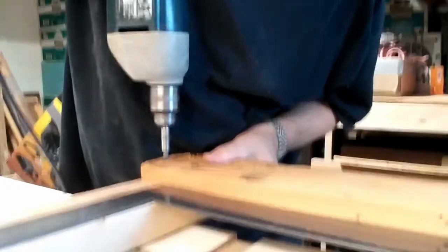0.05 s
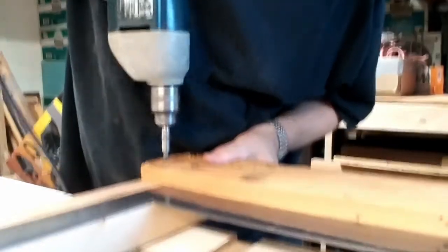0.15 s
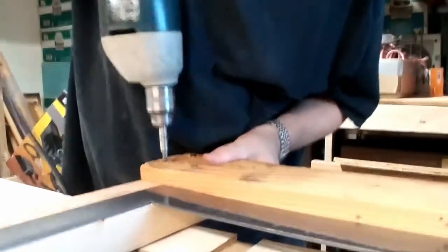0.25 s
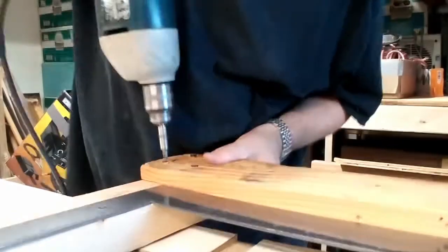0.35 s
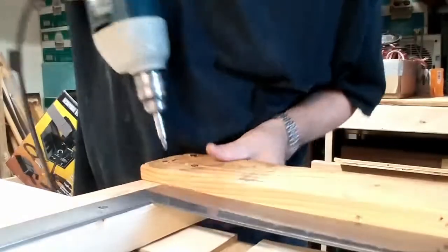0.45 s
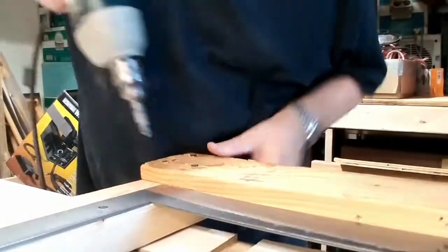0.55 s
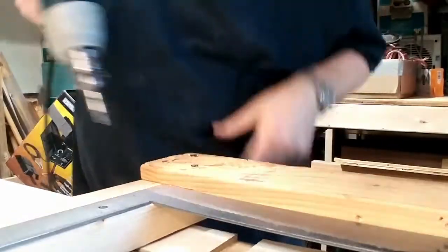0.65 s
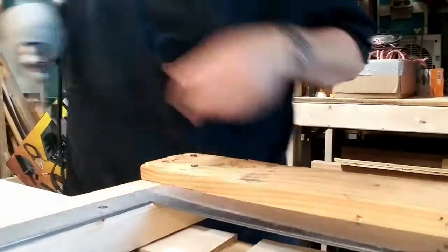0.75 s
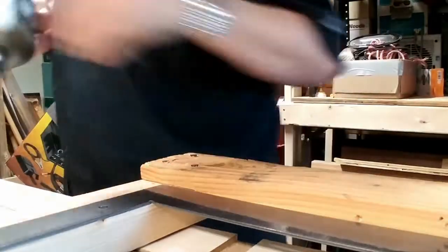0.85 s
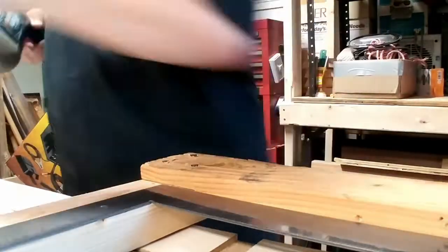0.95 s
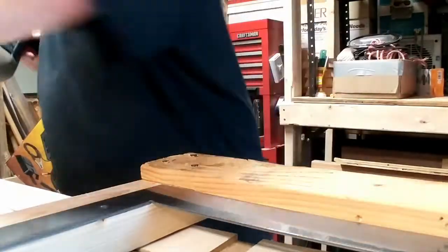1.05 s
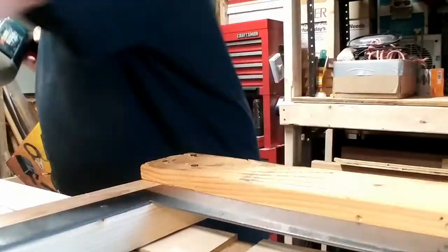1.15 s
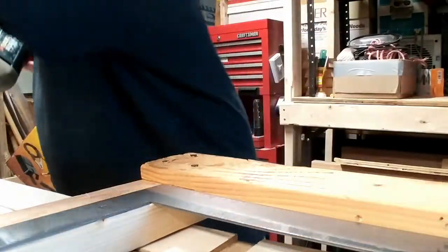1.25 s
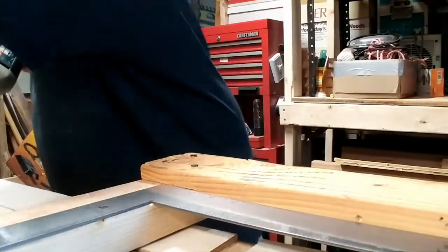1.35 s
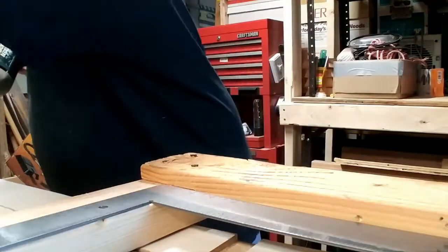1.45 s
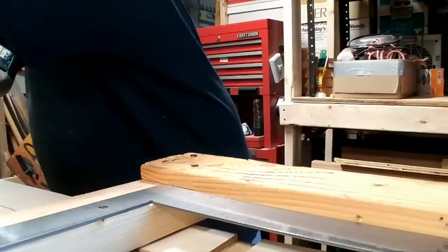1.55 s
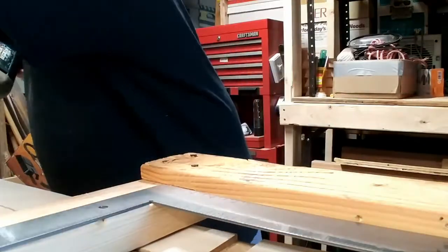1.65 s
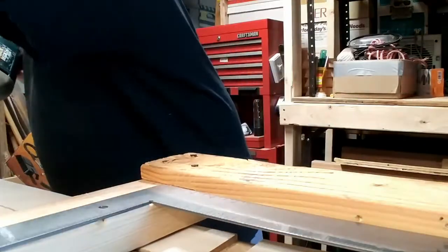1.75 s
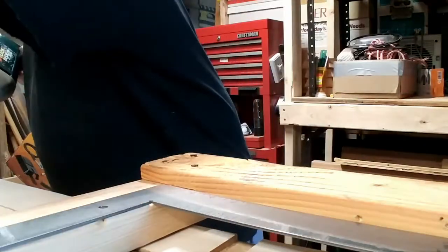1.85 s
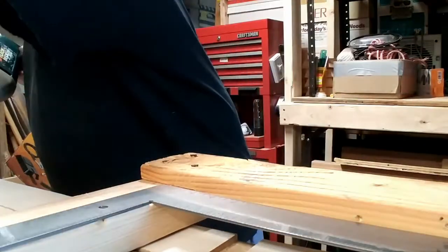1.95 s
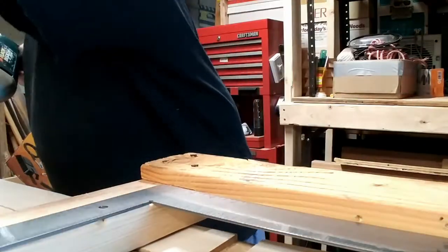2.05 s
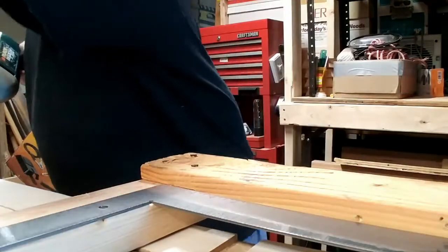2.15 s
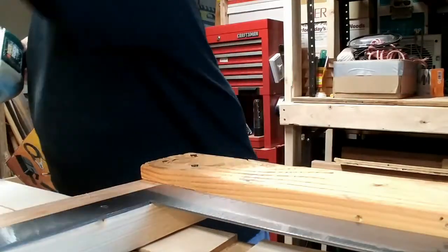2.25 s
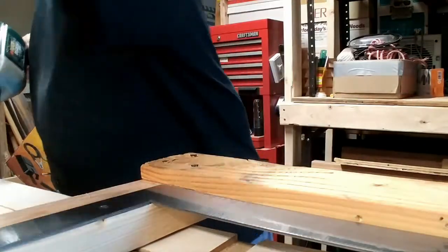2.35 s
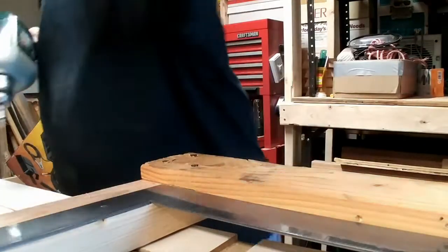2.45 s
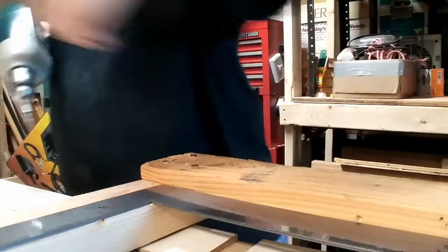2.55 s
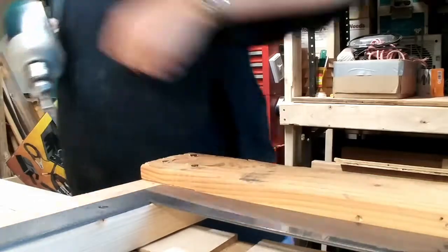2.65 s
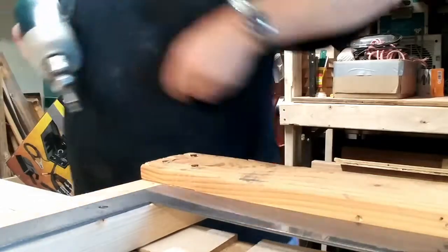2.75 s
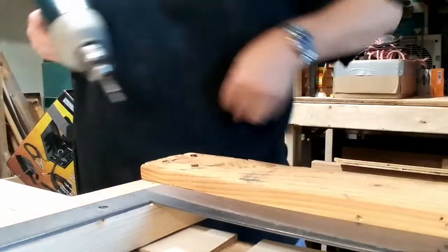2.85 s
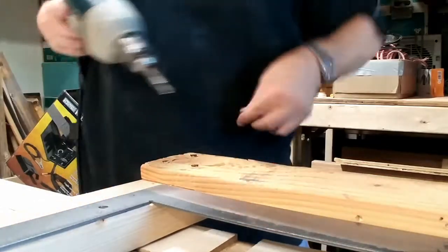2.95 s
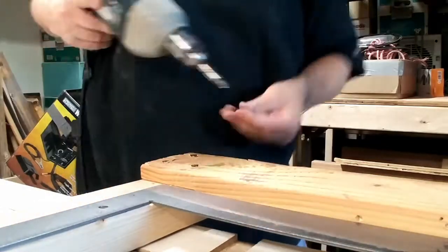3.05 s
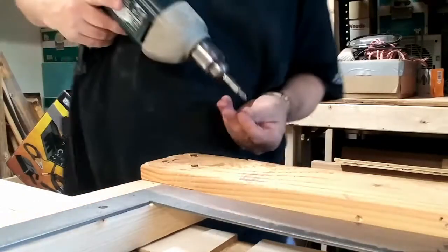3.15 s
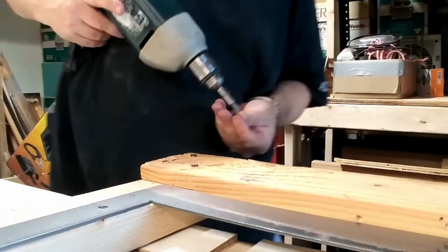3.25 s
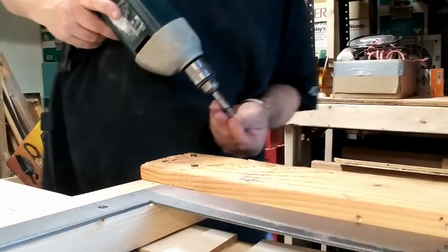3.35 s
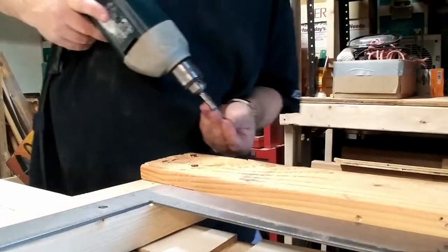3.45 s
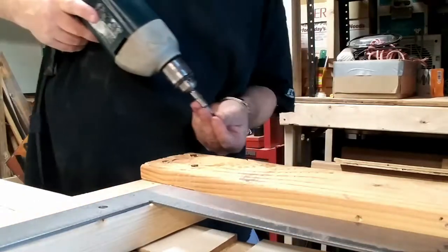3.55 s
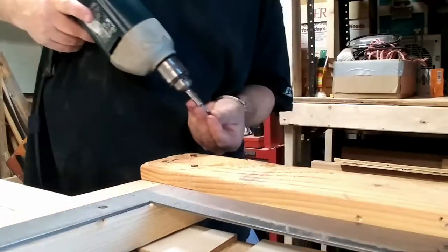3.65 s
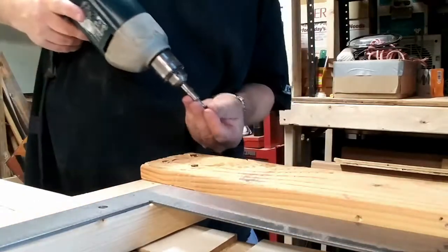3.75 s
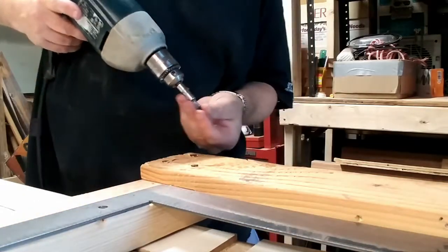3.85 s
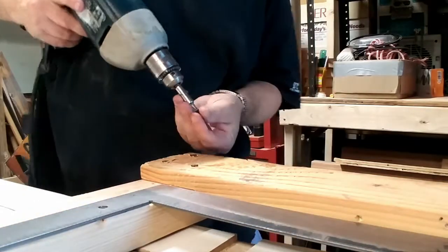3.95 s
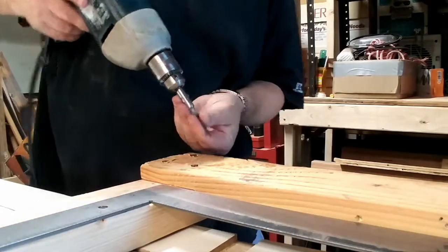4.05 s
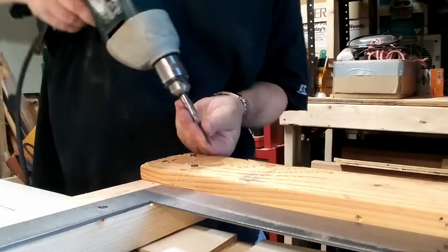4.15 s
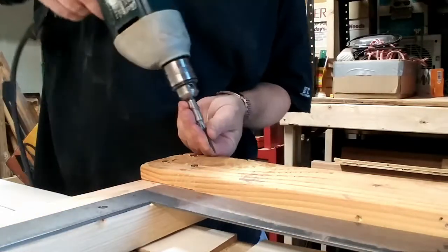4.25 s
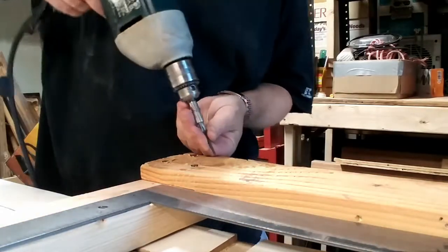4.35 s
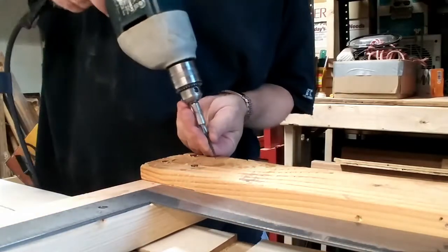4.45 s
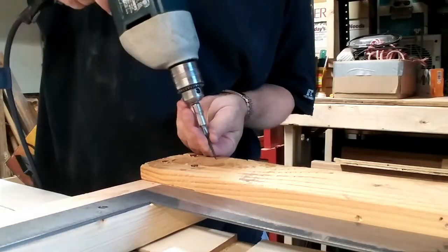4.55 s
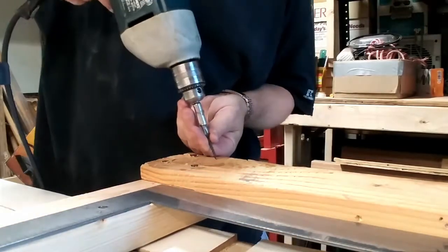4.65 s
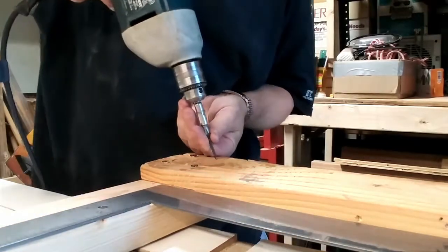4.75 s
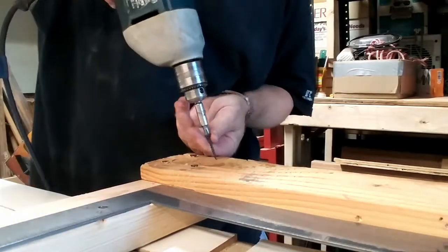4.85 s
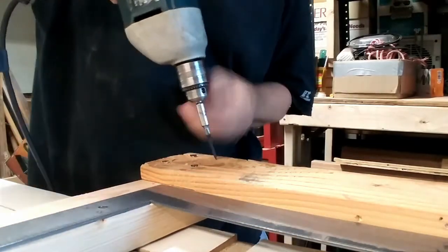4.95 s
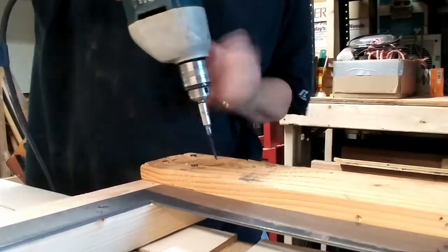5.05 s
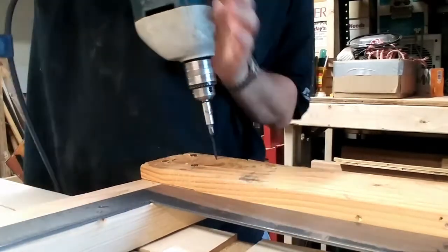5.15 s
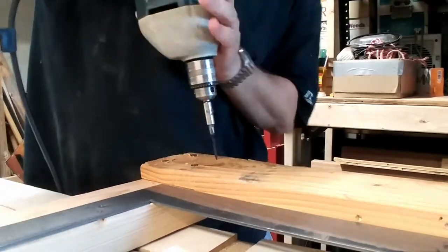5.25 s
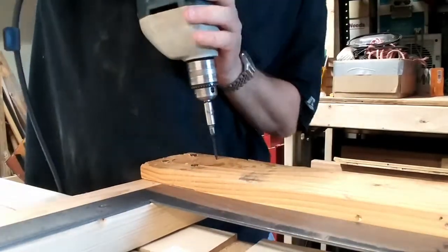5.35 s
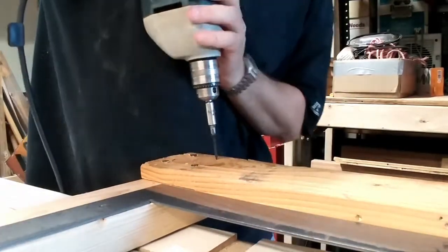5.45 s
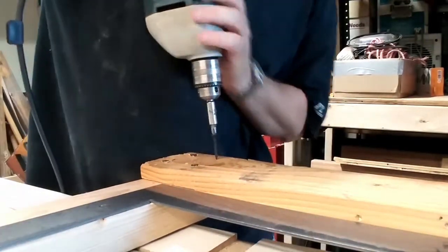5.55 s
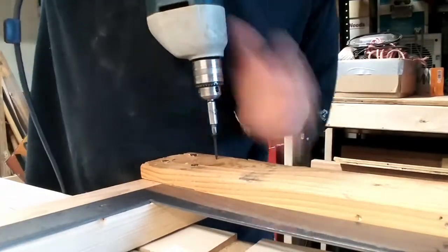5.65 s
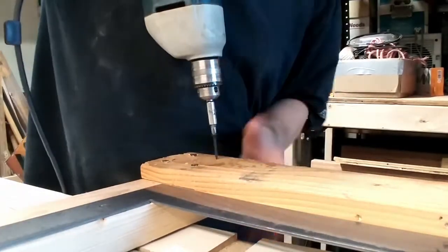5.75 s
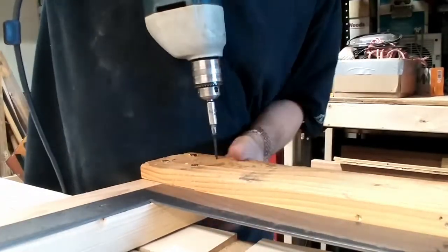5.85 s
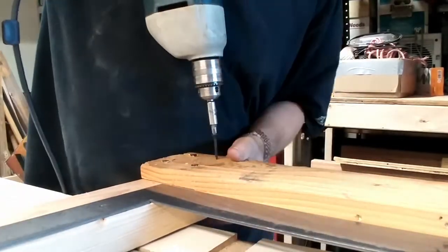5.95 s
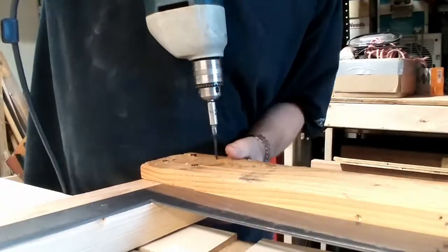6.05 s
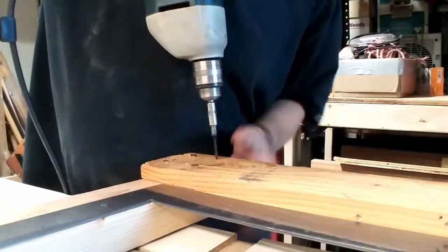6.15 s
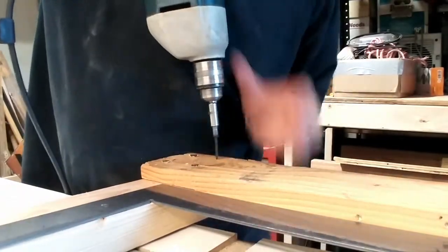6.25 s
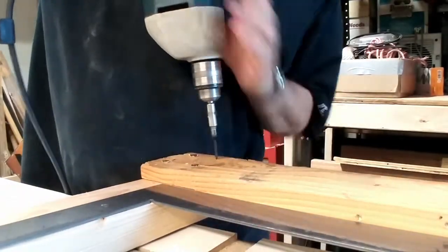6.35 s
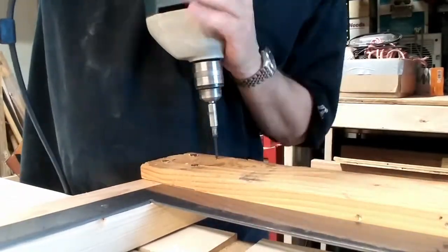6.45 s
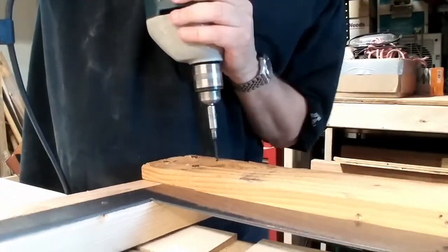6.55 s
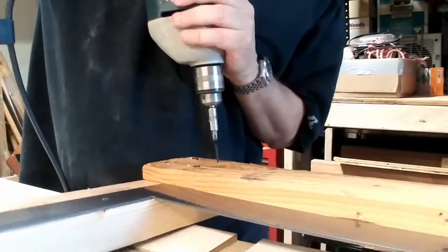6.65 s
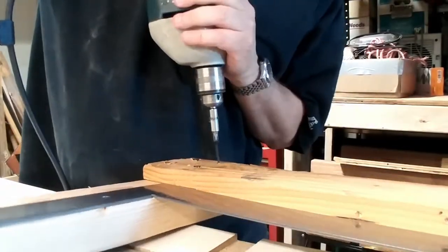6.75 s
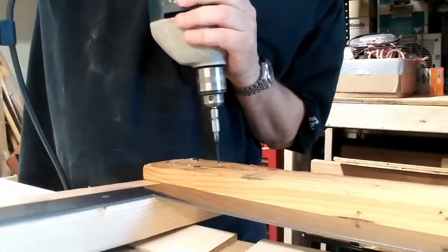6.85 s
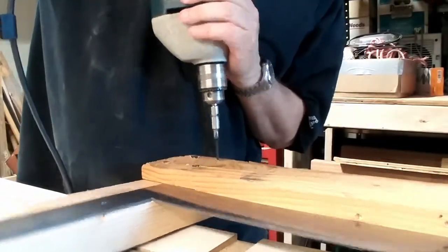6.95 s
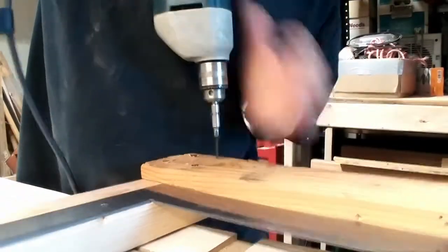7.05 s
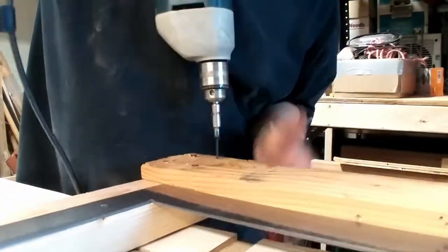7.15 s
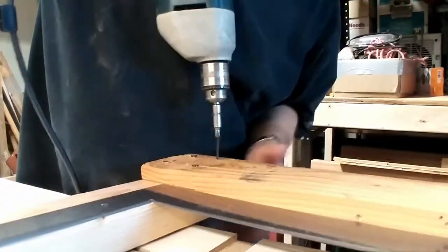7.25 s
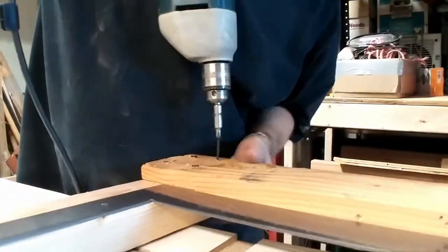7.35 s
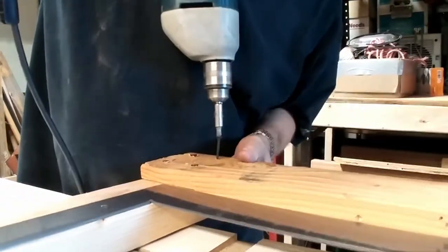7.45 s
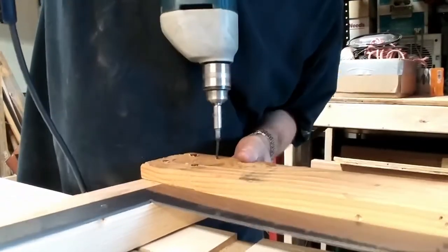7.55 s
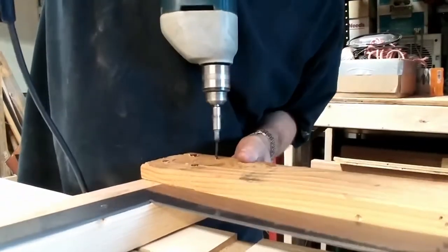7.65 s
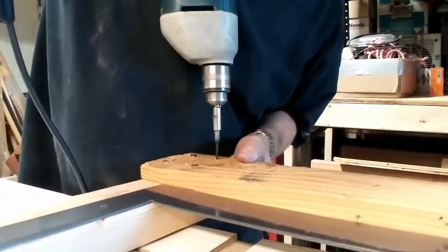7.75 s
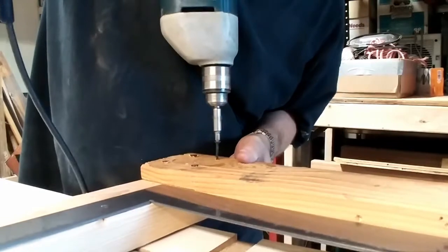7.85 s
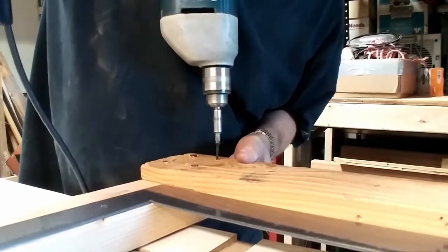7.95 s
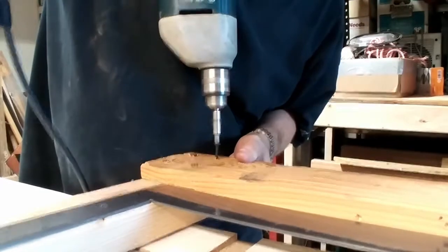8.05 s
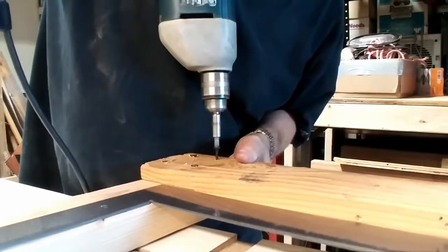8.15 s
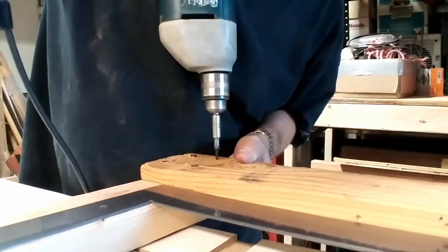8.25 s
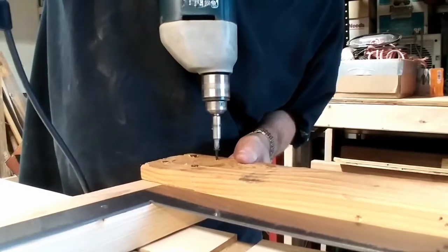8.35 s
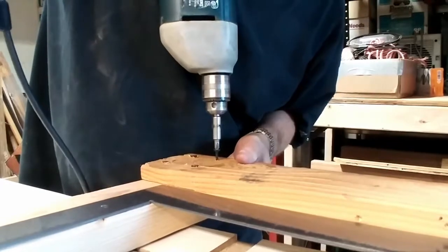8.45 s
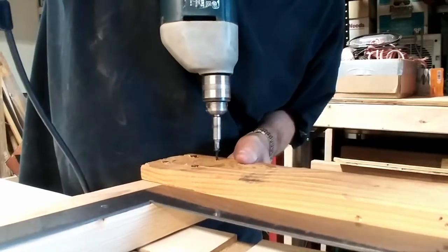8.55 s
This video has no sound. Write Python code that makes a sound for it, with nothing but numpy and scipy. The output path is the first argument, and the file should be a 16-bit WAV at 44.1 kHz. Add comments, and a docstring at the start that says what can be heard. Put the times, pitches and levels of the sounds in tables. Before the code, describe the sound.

Close in a small workshop, a loud electric drill rasps and whines, gliding down to silence within a second. A hand digs through loose screws in a box with bright metallic clatter. Cloth rustles and small ticks follow over faint hum. A short drill burst winds down, the plank knocks hard on the bench, then three quick motor bursts follow, the last cut off as it starts.

```python
"""A small workshop, where a corded drill drives screws into a plank in five runs of the motor.
Brush and gear rasp is noise chopped by the mains at a light trigger; the gear whine is a set of partials
gliding with the speed; the plank rumbles under load. Between screws a hand digs in a box of screws (noise
bursts and a ringing box), small things tick, cloth and cord rustle, and the plank knocks on the bench
(decaying modes). Hum lines and a low rumble lie under all; delays return the sound from the walls."""
import sys
import numpy as np
from scipy import signal
from scipy.fft import rfft, irfft, next_fast_len
from scipy.io import wavfile
from scipy.ndimage import uniform_filter1d

SR = 44100
rng = np.random.default_rng(int(sys.argv[2]) if len(sys.argv) > 2 else 0)


def int16_out(signal):
    """Quantize to a 16-bit WAV file."""
    q = np.round(np.clip(np.atleast_2d(signal).T, -1, 1) * 32767)
    wavfile.write(sys.argv[1], SR, q.astype(np.int16))


N = 380141

MAINS_HZ = 60.0
CREST = 3.04  # peak over rms of a noisy burst

# Five runs of the motor: [t/s, rasp level/dB, plank rumble level/dB, treble lift/dB]
MOTOR_RUNS = [
    [(0, -10.5, -18, 2.5), (.29, -12, -18, -5.5), (.37, -31, -31, 6), (.45, -33.5, -44, 7),
     (.7, -37.5, -53, 9), (.97, -64.5, -61, 13.5), (1.04, -83, -79, 3)],
    [(5.986, -50.5, -61, 10), (6.03, -33.5, -45, 5), (6.09, -24, -40.5, 2.5), (6.15, -14.5, -47, 7),
     (6.44, -18, -41.5, 4.5), (6.59, -21, -45, 6.5), (6.63, -24.5, -40.5, 5.5), (6.87, -47, -52, -3),
     (6.93, -64, -62, 0)],
    [(7.286, -47, -33.5, 6), (7.385, -23, -40, 2.5), (7.412, -9.5, -37, 4.5), (7.72, -15.5, -40.5, 10),
     (7.772, -18, -45, 1.5)],
    [(7.85, -18.5, -39, 3), (7.885, -8, -34.5, 0.5), (8.0, -15, -56, 10.5), (8.03, -12, -23, 5),
     (8.1, -17, -37, 11.5), (8.27, -12, -38, 5.5), (8.33, -21, -48, -4.5), (8.438, -44, -39, -3)],
    [(8.44, -40.5, -44.5, 7), (8.594, -22, -30, -4), (8.62, -16, -36, 1)],
]
# Motor speed where the whine is heard: [t/s, tooth rate f/Hz, whine level/dB, overtone tilt/dB per octave]
MOTOR_SPEED = [
    [(0, 1323, -17, -14), (.03, 1190, -33, -16), (.08, 1035, -23.5, -8), (.13, 947, -23.5, -9),
     (.2, 996, -25.5, -4.5), (.29, 1037, -32.5, -6)],
    [(.3, 1028, -41.5, -3), (.376, 919, -43.5, 3.5), (.554, 648.4, -46, 4.6), (.62, 580, -56, 1.8)],
    [(6.15, 415.6, -35, 4.5), (6.208, 435.4, -33, 2.5), (6.26, 402.1, -32, 5.5), (6.316, 367.4, -19, -2.5),
     (6.472, 266, -31, 3), (6.604, 182.4, -44, 6.5), (6.75, 141, -54.5, 10)],
    [(7.38, 447, -50, -2), (7.41, 629, -26, 8), (7.45, 928, -17, 3), (7.492, 1136, -11.5, 8),
     (7.53, 1252, -15, 1.5), (7.6, 1057, -15, 3.2), (7.714, 684.7, -13, 2.5), (7.808, 390.3, -30, -2)],
    [(7.81, 391, -28, 4), (7.87, 656, -18.5, 0.5), (7.948, 1113, -11.5, 0), (8.052, 1490, -16.5, 6.5),
     (8.104, 1470, -11.5, -0.7), (8.194, 1072, -15, 2), (8.28, 699, -15.5, 4), (8.368, 366.5, -24.5, -8),
     (8.4, 266, -44, 8)],
]


def from_db(db):
    """Level to amplitude: 20 dB is a factor of ten."""
    return 10 ** (np.asarray(db) / 20)


def rms_one(x):
    """Normalise the mean power, so that the rms is 1."""
    return x / np.sqrt(np.mean(x ** 2) + 1e-20)


def filtered(x, hz, kind):
    """Second-order Butterworth filtering: a maximally flat passband."""
    return signal.sosfilt(signal.butter(2, hz, kind, fs=SR, output="sos"), x)


def in_time(tables):
    """Linear interpolation of the columns of one or more tables, sample by sample."""
    s, *columns = np.transpose(np.vstack(tables))
    return [np.interp(np.arange(N) / SR, s, c) for c in columns]


def sounding(tables):
    """Gating: 1 inside the spans of the tables, 0 between, with 4 ms edges; overlapping edges add."""
    t = np.arange(N) / SR
    gates = [np.minimum(t - rows[0][0], rows[-1][0] - t) / .004 + 1 for rows in tables]
    return sum(np.clip(gate, 0, 1) for gate in gates)


def drift(rate):
    """Random modulation: white noise through a double low-pass pole, scaled to rms 1."""
    r = np.exp(-20 * np.pi * rate / SR)
    white = rng.standard_normal(N // 10 + 8002)  # one value per ten samples
    slow = signal.lfilter([1], [1, -2 * r, r * r], white)[8000:]
    return np.interp(np.arange(N) / 10, np.arange(len(slow)), rms_one(slow))


def noise(spectrum, peaks=()):
    """Spectral shaping of stereo noise with resonances on top and set interaural likeness; rms 1."""
    # Likeness of the two ears: [f/Hz, likeness 0-1]
    likeness = [(25, 0.44), (60, 0.024), (150, 0.96), (380, 0.88), (950, 0.12), (2400, 0.44), (6000, 0.064),
                (15000, 0.16)]
    size = next_fast_len(N)
    hz = np.maximum(np.arange(size // 2 + 1) * SR / size, 1)

    def read(points):
        f, value = np.transpose(points)
        return np.interp(np.log(hz), np.log(f), value)

    level_db = read(spectrum) + sum(db / (1 + (2 * (hz - f) / width) ** 2) for f, width, db in peaks)
    alike = np.clip(read(likeness), 0, 1)
    mid, side = rfft(rng.standard_normal((2, size))) * from_db(level_db)
    ears = np.sqrt(1 + alike) * mid + np.sqrt(1 - alike) * side * [[1], [-1]]
    return rms_one(irfft(ears, size)[:, :N])


def fine_modes(count, low_hz, high_hz, width_hz, db):
    """Modal density: many narrow resonances scattered unevenly in log pitch, no two on the same spot."""
    places = (np.arange(count) + .7 * rng.random(count)) / count
    return [(low_hz * (high_hz / low_hz) ** u, width_hz, db) for u in places]


def ring(clicks, hz, t60):
    """A damped resonator: a unit click sets a decaying sine of height 1 ringing."""
    r, w = from_db(-60 / (max(t60, .005) * SR)), 2 * np.pi * hz / SR
    return signal.lfilter([0, np.sin(w)], [1, -2 * r * np.cos(w), r * r], clicks + 1e-18)


def strike(events, modes, spread_db):
    """Modal superposition: each blow starts every mode in step, each with a chance strength of its own."""
    at, blows = [round(row[0] * SR) for row in events], np.array(events)[:, 1]
    out, luck = np.zeros(N), rng.normal(0, spread_db, (len(at), len(modes)))
    for k, (hz, db, t60) in enumerate(modes):
        clicks = np.zeros(N)
        clicks[at] = from_db(blows + db + luck[:, k])
        out += ring(clicks, hz, t60)
    return out / from_db(np.array(modes)[:, 1]).sum()


def dying(s, db, t60):
    """Exponential decay: an envelope that jumps up at s and is cut off after half a second."""
    out, start = np.zeros(N), round(s * SR)
    t = np.arange(min(SR // 2, N - start)) / SR
    out[start:start + len(t)] = from_db(db - 60 * t / np.clip(t60, .005, .4))
    return out


def reach(s, length, db, fade_db_per_s):
    """Two-rate decay: quick attack, slow fade while the hand moves, fast fade as the screws settle."""
    attack_s, settle_db_per_s = 0.022, 304
    t = np.arange(N) / SR - s
    loss_db = fade_db_per_s * np.clip(t, 0, length) + settle_db_per_s * np.maximum(t - length, 0)
    return np.clip(1 + t / attack_s, 0, 1) ** 2 * from_db(db - loss_db)


def hum_lines():
    """Amplitude modulation: steady tones waver in level and phase, and one more beats and swells."""
    # Wavering lines: [f/Hz, level/dB, waver/dB]
    lines = [(58.3, -59.5, 0.5), (68.5, -59, 3.5), (118, -66, 4), (145.5, -68.5, 3.5), (236.9, -71.5, 7.5)]
    # Beating line: [f/Hz, level/dB, beats per s, swells per s, t of a loudest moment/s, swell depth 0-1]
    beating = (357, -70, 6.18, 2.06, 2.57, .5)
    t, hum = np.arange(N) / SR, np.zeros(N)
    for hz, db, waver_db in lines:
        throb = from_db(db + waver_db * np.clip(drift(6), -3, 1.0))
        hum += throb * np.sqrt(2) * np.sin(2 * np.pi * hz * t + 0.55 * drift(2.1))
    hz, db, beats, swells, s, depth = beating
    beat = 2 * np.cos(np.pi * beats * (t - s))
    swell = 1 + depth * np.cos(2 * np.pi * swells * (t - s))
    return hum + from_db(db) * beat * swell * np.sin(2 * np.pi * hz * t)


def shop_air():
    """Broadband room noise: a lumpy low rumble whose level drifts slowly."""
    # Spectrum of the air: [f/Hz, level/dB per Hz]
    air = [(12, -35.5), (20, -30.5), (65, -4.5), (142, -12), (193, -9), (241, -8.5), (301, -17), (357, -10),
           (434, -17.5), (624, -18), (1120, -27.5), (7520, -38), (10500, -56), (14700, -43.5),
           (16000, -55.5)]
    return from_db(-62.5 + 2.0 * drift(2.1)) * noise(air)


def shop(x):
    """Reverberation by recirculation: six feedback delays a side, duller on every round, with little bass."""
    t60_s, wall_cut_hz, bass_cut_hz = 0.19, 2500, 250
    size = next_fast_len(N + SR)
    w = 2 * np.pi * np.arange(size // 2 + 1) / size
    dull = 1 / (1 + 1j * w * SR / (2 * np.pi * wall_cut_hz))
    thin = 1 - 1 / (1 + 1j * w * SR / (2 * np.pi * bass_cut_hz))  # thin walls return little bass
    answer = np.zeros((2, len(w)), complex)
    for k, lag in enumerate(rng.uniform(0.0054, 0.032, 12)):  # seconds
        loop = from_db(-60 * lag / t60_s) * dull * np.exp(-1j * w * lag * SR)
        answer[k % 2] += loop / (1 - loop) * thin * (-1) ** (k // 2)
    return irfft(rfft(x, size) * answer, size)[:, :N]


def rustle():
    """Friction noise: sleeves and cord rub in two stretches, each with coloured bands of its own."""
    # Rubs in each stretch: [start t/s, end t/s, level/dB]
    rubs = [
        [(2.28, 2.86, -65.5), (2.86, 3.46, -68.5), (3.57, 3.73, -61.5)],
        [(4.4, 5.5, -71.5), (5.53, 5.6, -63.5), (5.91, 5.97, -63)],
    ]
    # Spectrum of each stretch: [f/Hz, level/dB per Hz]
    cloth = [
        [(410, -34), (700, 1.5), (791, -11), (1070, -11.5), (1510, -8.5), (2080, -8), (3360, -7.5),
         (8560, -12.5), (10000, -18), (13000, -52), (22000, -120)],
        [(410, -31), (700, -3.5), (904, -15), (1760, -11.5), (1950, -9.5), (3140, -9.5), (5190, -10),
         (5800, -12), (10000, -17.5), (13000, -55), (22000, -120)],
    ]
    # Coloured bands of each stretch: [f/Hz, width/Hz, lift/dB]
    scrapes = [
        [(1539, 50, 12), (3470, 200, 9)],
        [(1986, 120, 11), (5950, 300, 8)],
    ]
    edge_share = .3  # share of each rub spent swelling, and again fading
    t, out = np.arange(N) / SR, np.zeros((2, N))
    for rows, spectrum, bands in zip(rubs, cloth, scrapes):
        level = np.zeros(N)
        for s, end, db in rows:
            edge = np.minimum(t - s, end - t) / (edge_share * (end - s))
            level += from_db(db) * np.clip(edge, 0, 1)
        out += level * from_db(1.5 * drift(18) + 2.0 * drift(4)) * noise(spectrum, bands)
    return out


def small_ticks():
    """Impact bursts: small things tick as decaying noise, each in a band around a pitch of its own."""
    # Ticks: [t/s, peak level/dB, centre f/Hz, t60/s]
    ticks = [(2.763, -47.5, 670, 0.082), (3.069, -44.5, 653, 0.28), (3.275, -51.5, 2860, 0.12),
             (3.38, -44.5, 3000, 0.2), (3.619, -47, 576, 0.11), (3.732, -35.5, 684, 0.15),
             (3.819, -38.5, 5560, 0.11), (4.118, -31, 1175, 0.15), (5.522, -44, 6080, 0.15),
             (5.899, -42.5, 5270, 0.093)]
    out, white = np.zeros((2, N)), noise([(100, -9), (16000, -11.0)])
    for s, db, hz, t60 in ticks:
        at = slice(round(s * SR), round(s * SR) + SR // 3)
        burst = filtered(white[:, at], [hz / 2.46, min(hz * 1.67, 15000)], "band")
        out[:, at] += dying(s, db, t60)[at] * rms_one(burst) / CREST
    return out


def plank():
    """Impact excitation of modes: knocks ring the wood, shake the bench, crack and jingle a steel rule."""
    # Plank on bench: [t/s, knock level/dB, crack level/dB]
    knocks = [(6.981, 0.5, -11), (6.995, -14, -22), (7.003, -9.5, -25), (7.032, -22, -38),
              (7.067, -35, -28), (7.122, -15.5, -40.5), (7.164, -19, -41), (7.425, -10.5, -20),
              (8.026, -8, -11.5)]
    # Modes of the wood: [f/Hz, level/dB, t60/s]
    wood = [(71.8, -9.5, 0.76), (133, -16, 0.12), (181, -7, 0.21), (260, -0.5, 0.13), (308, 3.5, 0.071),
            (376, -13, 0.12), (586, 1.5, 0.055), (692, 5, 0.052), (858, -9, 0.03)]
    # Steel rule jingling on the bench: its blows [t/s, level/dB]; its modes [f/Hz, level/dB, t60/s]
    jingles = [(6.984, -38), (7.036, -42), (7.07, -16)]
    rule = [(1450, -1, .2), (2000, 0, .12), (2550, -6, .08), (3060, -3, .18), (4050, -9, .08)]
    # Spectrum of the shuddering bench: [f/Hz, level/dB per Hz]
    thud = [(25, -32), (45, -5), (185, 0.5), (340, -4), (520, -13.5), (870, -18.5), (1500, -30),
            (3000, -73)]
    thud_db, thud_t60_s = -15, 0.39  # level against the knock
    crack = sum(dying(s, crack_db, 0.16) for s, db, crack_db in knocks)
    shudder = sum(dying(s, db + thud_db, thud_t60_s) for s, db, crack_db in knocks)
    wide = crack * noise([(600, 5.0), (2000, 0.0), (6000, -16.0), (16000, -41.0)]) + shudder * noise(thud)
    blows = strike(knocks, wood, spread_db=1.5) + strike(jingles, rule, spread_db=2.0)
    return filtered(blows, 4000, "low") + wide


def screw_box():
    """Granular noise in dense modes: screws clatter, each tumble bursts out and rings the damped box."""
    # Screws tumble: [t/s, peak level/dB, box level/dB, box f/Hz, t60/s]
    tumbles = [(1.092, -55, -45, 444, 0.1), (1.206, -46.5, -55, 434, 0.38), (1.2482, -30, -32, 507, 0.1),
               (1.2644, -10, -16.5, 453, 0.19), (1.32, -17, -44, 490, 0.139),
               (1.3896, -23.5, -26, 513, 0.13), (1.474, -33, -38, 490, 0.11), (1.592, -27, -41, 496, 0.053),
               (1.7218, -38, -49, 504, 0.11), (1.7636, -28.5, -37, 435, 0.12), (1.794, -26, -58, 411, 0.12),
               (1.8558, -27, -32, 431, 0.15), (1.9916, -39, -22.5, 497, 0.36),
               (2.0689, -11.5, -16.5, 515, 0.08), (2.2473, -21.5, -25, 640, 0.089),
               (2.2596, -21, -21, 603, 0.1)]
    # The hand ploughs through the screws: [t/s, length/s, rattle level/dB, box drumming level/dB]
    reaches = [(1.103, 0.046, -58.5, -39), (1.256, 0.16, -22, -51), (1.472, 0.13, -26, -44.5),
               (1.751, 0.24, -45, -47.5), (1.998, 0.15, -37, -47.5), (2.244, 0.034, -41, -50)]
    # Spectra of the screws and of the drumming box: [f/Hz, level/dB per Hz]
    screws = [(410, -8), (700, 0.5), (1400, -11), (2050, -1.5), (2300, -5.5), (2840, -3.5), (3940, -8),
              (4670, -5), (6830, -10.5), (8100, -3), (10500, -22.5), (13000, -18), (16000, -21)]
    drummed = [(24, -34.5), (40, 0.5), (123, 3), (234, -6.5), (343, -8.5), (384, -9), (573, -16),
               (1200, -36), (1560, -78.5), (2640, -120)]
    rattle_fade_db_per_s, drum_fade_db_per_s = 73, 65
    box_t60_s, box_damped_s = 0.31, 0.054
    left_lag = 16  # samples by which the left ear hears the box late
    grains = rms_one(from_db(2.3 * drift(190) + 1.3 * drift(50)))
    level = sum(reach(s, length, db, rattle_fade_db_per_s) for s, length, db, drum_db in reaches)
    drumming = sum(reach(s, length, drum_db, drum_fade_db_per_s) for s, length, db, drum_db in reaches)
    box, t = np.zeros(N), np.arange(N) / SR
    for s, db, box_db, hz, t60 in tumbles:
        level += dying(s, db, t60) / CREST
        choke = np.exp(-((t - s) / box_damped_s) ** 2)  # loose screws choke the ring
        note = ring(dying(s, 0, 0.004), hz, box_t60_s) * choke
        box += from_db(box_db) * note / np.abs(note).max()
    modes = fine_modes(count=50, low_hz=1468, high_hz=12640, width_hz=25, db=2.5)
    steel = grains * noise(screws, modes)
    # the box hums along
    hollow = from_db(-11.5) * noise([(300, -18), (490, 28), (800, -50.0)], [(487, 56, 14.0)])
    both = level * (steel + hollow) + drumming * noise(drummed) + box
    left, right = both * from_db([[-1.2], [1.2]])
    return np.array([np.roll(left, left_lag), right])


def winding_hum():
    """Magnetic force goes as the field squared: under load the windings hum at twice the mains."""
    # Winding hum: [t/s, level/dB]
    winding = [(8.3, -46), (8.42, -47), (8.62, -30)]
    tone = np.sqrt(2) * np.sin(4 * np.pi * MAINS_HZ * np.arange(N) / SR)
    return sounding([winding]) * from_db(in_time([winding])[0]) * tone


def plank_rumble():
    """Forced vibration: the plank rumbles as noise, and the turning shaft shakes it at its harmonics."""
    # Spectrum of the rumble: [f/Hz, level/dB per Hz]
    low = [(18, -54), (30, -21.5), (54, -3), (199, -4.5), (318, -4.5), (474, -5.5), (571, -6), (815, -7),
           (900, -4.5), (1170, -49), (1980, -120)]
    # Shaft harmonics: [multiple of the shaft rate, level against the rumble/dB]
    growl = [(1, -7.5), (2, -4), (3, -5.5), (4, -4.5)]
    teeth = 15  # per turn of the shaft
    rumble_db = in_time(MOTOR_RUNS)[1]
    rumble = from_db(rumble_db + 0.93 * drift(42)) * noise(low)
    tooth_hz = in_time(MOTOR_SPEED)[0] * (1 + .03 * drift(15))
    shaft = 2 * np.pi * np.cumsum(tooth_hz) / SR / teeth
    for k, db in growl:
        rumble = rumble + from_db(rumble_db + db + 1.2 * drift(25)) * np.sin(k * shaft)
    return rumble


def rasp():
    """Amplitude modulation of resonant noise: one kick per mains cycle at a light trigger, then steady."""
    # Spectrum of brushes and gears: [f/Hz, level/dB per Hz]
    brushes = [(150, -32), (250, -22), (319, -12.5), (484, -17.5), (576, -9.5), (816, -8.5), (1060, 0.5),
               (1820, -4.5), (1980, -6), (2710, -0.5), (3340, -3.5), (8400, -11), (10900, -25.5),
               (12500, -20.5), (16000, -29.5)]
    # Housing resonances: [f/Hz, width/Hz, lift/dB]
    housing = [(1050, 350, -2.5), (1595, 58, 2.5), (2030, 110, 6), (2224, 210, 6), (2734, 160, 3.5),
               (3150, 220, 3), (4670, 120, 1)]
    # Light trigger, the kicks merge as it is pulled home: [t/s, length/s]
    squeezes = [(5.955, 0.24), (7.268, 0.17), (7.78, 0.0464), (8.431, 0.15)]
    firing_s = 6.02  # instant of one kick
    ring_lift_db = -0.97  # lift of the housing ring
    flare_s, flare_half_s, flare_db = 6.41, 0.032, 9.6  # the ring flares once
    rasp_db, rumble_db, treble_db = in_time(MOTOR_RUNS)
    t = np.arange(N) / SR
    chop = sum((t > s) * np.clip(1 - ((t - s) / length) ** 2, 0, 1) for s, length in squeezes)
    cycle = (t - firing_s) * MAINS_HZ % 1
    kick = 1 - chop + chop * rms_one(np.exp(-3.5 * cycle))
    chatter = rms_one(from_db(drift(150) + drift(30)))  # loose gears rattle unevenly
    modes = fine_modes(count=40, low_hz=602.0, high_hz=9290, width_hz=34, db=5.5)
    raw = noise(brushes, housing + modes)
    top = filtered(raw, 5000, "high")
    shell = filtered(raw, [1900, 3200], "band")
    # the treble follows its own curve, and the shell rings out briefly once; both flicker
    ring_db = ring_lift_db + flare_db * np.exp(-((t - flare_s) / flare_half_s) ** 2)
    top_gain = from_db(treble_db + 2.0 * drift(27)) - 1
    shell_gain = from_db(ring_db + 1.7 * drift(58)) - 1
    return from_db(rasp_db) * kick * chatter * (raw + top * top_gain + shell * shell_gain)


def whine():
    """Gear meshing: harmonics of the tooth rate flutter and swell as they glide through the housing's range."""
    # Partials: [multiple of the tooth rate, level/dB]
    partials = [(1, 0), (2, -4.5), (3, -4.5), (4, -11), (5, -13), (6, -14), (7, -16), (8, -15)]
    # How the housing radiates a tone: [f/Hz, level/dB]
    passes = [(150, -22), (400, -12.5), (700, -3), (1000, 0), (1230, 3), (1430, 0), (1660, 0), (1950, -3.5),
              (2800, -0.5), (3600, -1.5), (4500, -1.5), (7000, -12), (12000, -29.5)]
    # Running free, one partial leads: [stretch of the speed table, multiple, lift/dB]
    leading = [(1, 3, 7), (2, 4, 12)]
    # A tone at 2.5 times the tooth rate shows once at top speed: [t/s, half length/s, level/dB]
    extra_tone = (7.52, .04, -18)
    driven_full_db, driven_hz_per_s = -11, 2600  # partials from the third up sink while the motor speeds up
    hz, level_db, tilt_db = in_time(MOTOR_SPEED)
    turn = 2 * np.pi * np.cumsum(hz * (1 + .006 * drift(40) + .006 * drift(150))) / SR
    speeding_up = uniform_filter1d(np.gradient(hz) * SR, size=SR // 40)  # Hz per s
    driven_db = driven_full_db * np.clip(speeding_up / driven_hz_per_s, 0, 1)
    body_hz, body_db = np.transpose(passes)
    out = np.zeros((2, N))
    for k, db in partials:
        flutter = rms_one(from_db((2 + .8 * min(k, 3)) * drift(30)))
        lift_db = sum(lift * sounding([MOTOR_SPEED[n]]) for n, leader, lift in leading if leader == k)
        # the phase between the ears wanders
        apart = .5 * np.sqrt(k) * (0.17 + 0.54 * drift(6)) * [[1], [-1]]
        radiated_db = np.interp(np.log(k * hz), np.log(body_hz), body_db)
        gain_db = level_db + db + (k > 2) * driven_db + lift_db + tilt_db * np.log2(k) + radiated_db
        out += from_db(gain_db) * flutter * np.sin(k * turn + rng.uniform(0, 2 * np.pi) + apart)
    s, half, db = extra_tone
    swell = np.exp(-((np.arange(N) / SR - s) / half) ** 2)
    out += from_db(db + 2.5 * drift(35)) * swell * np.sin(5 * turn / 2)
    return np.sqrt(2) * np.minimum(sounding(MOTOR_SPEED), 1) * out


def drill():
    """Superposition of the drill's sources: rasp and plank rumble while it runs, winding hum and whine."""
    running = sounding([MOTOR_RUNS[0], MOTOR_RUNS[1], np.vstack(MOTOR_RUNS[2:])])
    return running * (rasp() + plank_rumble()) + winding_hum() + whine()


def scene():
    """Direct and reverberant field: everything on the bench also comes back from the walls."""
    background = shop_air() + hum_lines() + rustle() + small_ticks()
    near = plank() + screw_box() + drill()
    return background + near + from_db(-12.5) * shop(near.mean(axis=0))


def record(dry):
    """Band limiting and saturation: deep bass drops, hiss is added, peaks flatten, the top is cut."""
    hiss_db, cutoff_hz = -82, 16450
    heard = filtered(dry, 35, "high")
    # microphone self-noise
    heard = heard + from_db(hiss_db) * noise([(6000, -13.0), (10000, -5.5), (14000, 0.5)])
    loud = heard / (1 + np.abs(heard) ** 6.0) ** (1 / 6.0)  # flattens at full scale
    return signal.sosfilt(signal.cheby2(26, 50, cutoff_hz, fs=SR, output="sos"), loud)


dry = scene()
out = record(dry)
int16_out(out)
```